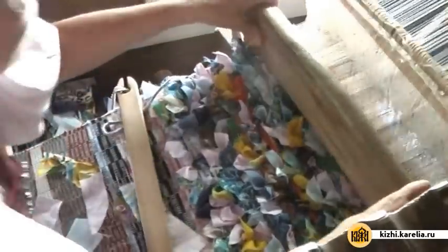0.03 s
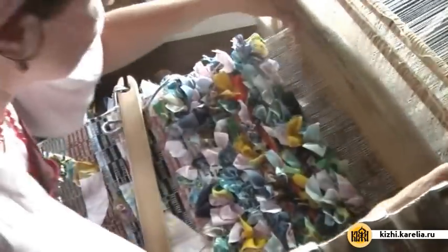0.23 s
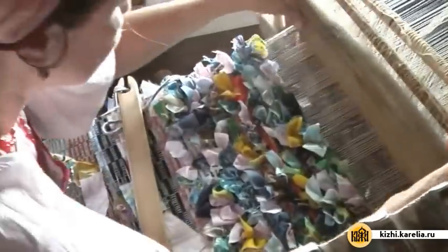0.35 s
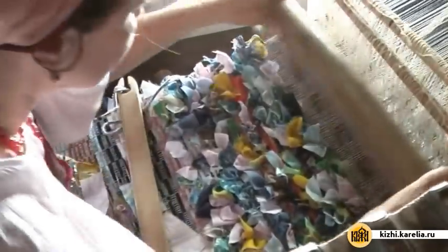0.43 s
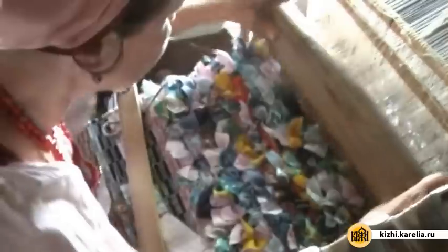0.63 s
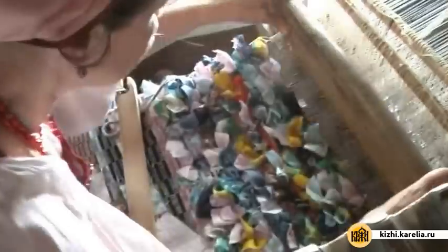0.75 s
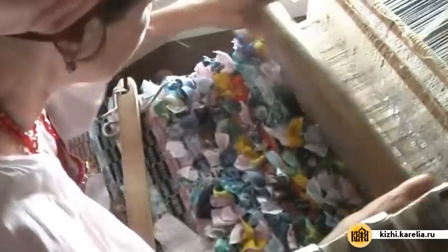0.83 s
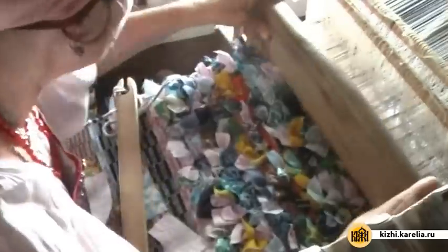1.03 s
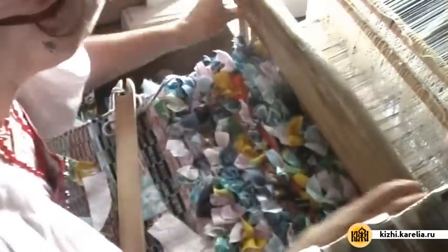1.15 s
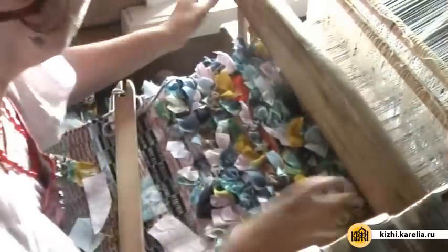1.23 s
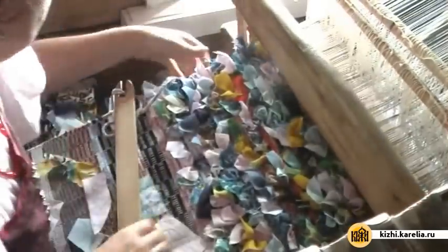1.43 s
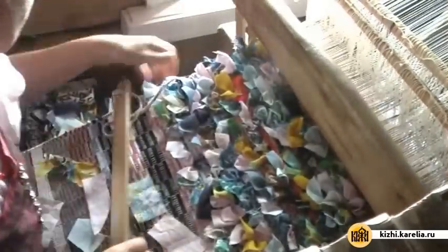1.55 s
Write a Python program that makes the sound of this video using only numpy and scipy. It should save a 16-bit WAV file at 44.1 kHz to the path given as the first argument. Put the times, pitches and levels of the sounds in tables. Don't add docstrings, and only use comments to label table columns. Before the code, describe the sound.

A wooden loom beater knocks lightly, then lands two heavy, clattering blows on rag weave; loose slats rattle and small parts tick, fading into quiet room air. Close microphone in a small room, slightly thin sound.

```python
import sys
import numpy as np
from scipy import signal
from scipy.fft import rfft, irfft
from scipy.io import wavfile
from scipy.ndimage import uniform_filter1d

SR = 44100
rng = np.random.default_rng(int(sys.argv[2]) if len(sys.argv) > 2 else 0)


def to_linear_factor(level_db):
    exponent = np.asarray(level_db, float) / 20
    return 10 ** exponent


def dump_mix(stems):
    frames = np.atleast_2d(stems).T
    limited = np.clip(frames, -1, 1)
    pcm = np.round(limited * 32767).astype(np.int16)
    wavfile.write(sys.argv[1], SR, pcm)


N = 70560

# (time [s], peak [dB], knock pitch [Hz])
BLOWS = [(.118, -30.5, 249), (.168, -23.5, 570), (.2115, -15.5, 385), (.2245, -15, 365), (.231, -17, 412),
         (.25, -19, 234), (.2615, -26.5, 336), (.487, -60, 196), (.556, -15, 870), (.572, -17.5, 196),
         (.596, -8, 660), (.606, -14.5, 550), (.615, -8.5, 287), (.6255, -18, 275), (0.658, -13, 111),
         (.669, -24, 197), (.687, -12, 215), (.745, -19, 186), (0.777, -23, 185), (.920, -18.5, 550),
         (.943, -12.5, 224), (.956, -26, 297), (.969, -6, 255), (.978, -7.5, 251), (.988, -12, 250),
         (1.008, -12, 183), (1.031, -12.5, 114), (1.056, -16.5, 190), (1.15, -23, 360)]
# (frequency [Hz], level [dB], t60 [s])
FRAME_MODES = [(88, -8, .2), (116, -1, .4), (160, -13, .15), (191, 1, .55), (252, -3, .22), (335, -2, .45),
               (382, -5, .15), (480, -10, .1), (540, -9, .1), (655, -8, .1), (765, -11, .08),
               (972, -11, .08)]
# (time [s], peak [dB], brightness [octaves above 1 kHz], t60 [s])
CLACKS = [(0.0476, -27.5, 1.15, 0.24), (0.1456, -26.5, 0.79, 0.13), (0.16, -22.5, 2, 0.13),
          (0.181, -24, 1.46, 0.12), (0.2121, -20.5, 0.13, 0.4), (0.2981, -11, 1.28, 0.25),
          (0.3788, -18, 1.12, 0.14), (0.4732, -29, 1.67, 0.42), (0.512, -28, 2.16, 0.21),
          (0.5601, -9, 1.8, 0.16), (0.5937, -18.5, 0.68, 0.39), (0.6231, -16.5, 2, 0.14),
          (0.6432, -26, 0.87, 0.16), (0.6702, -12, 0.18, 0.13), (0.6785, -8.5, 0.96, 0.12),
          (0.6935, -17.5, 2, 0.12), (0.7908, -20.5, 0.77, 0.18), (0.9197, -7, 1.8, 0.15),
          (0.9461, -9.5, 0.62, 0.14), (1.0086, -14, 1.7, 0.061), (1.0317, -14.5, 1.9, 0.047),
          (1.0645, -15, 1.2, 0.1), (1.0686, -15.5, 1.27, 0.12), (1.096, -19.5, 1.77, 0.26),
          (1.1474, -19, 1.55, 0.046), (1.2012, -28.5, 2.3, 0.11), (1.2091, -22, 1.24, 0.09),
          (1.2281, -33, 0.6, 0.12), (1.3005, -36, 0.78, 0.12), (1.3381, -25, 1.5, 0.074),
          (1.5163, -37.5, 1.68, 0.54)]
# (frequency [Hz], width [Hz], level [dB])
SLAT_MODES = [(1072, 130, 3.5), (1270, 410, 1.5), (1540, 110, -13), (2360, 510, -5.5), (3080, 120, -19.5),
              (5260, 550, -22)]
# (frequency [Hz], level [dB], t60 [s])
BAR_MODES = [(1170, -4, .06), (1340, 0, .07), (1675, -5, .1), (2148, -7, .08), (2530, -2, .1),
             (2896, -3, .1), (3359, -2, .13), (3450, -7, .1), (3850, -5, .05), (4200, -3, .08),
             (4689, -4, .06), (5163, -3, .06), (5572, -4, .06), (5820, -4, .06)]
# (time [s], peak [dB], pitch [Hz], t60 [s])
TAPS = [(.197, -29, 1346, 0.05), (.215, -25, 1680, 0.032), (.2185, -13.5, 382, 0.039),
        (.2325, -12, 383, 0.024), (.2625, -23, 405, .03), (.4755, -32, 1433, .1), (.479, -34, 2850, .04),
        (.487, -34, 1430, 0.082), (.499, -34, 1496, 0.063), (.52, -38, 1460, .06),
        (.5615, -18, 2450, 0.021), (.573, -19, 1438, 0.074), (.582, -17, 1020, 0.031),
        (.625, -24, 1406, 0.043), (.627, -14.5, 705, .04), (.65, -23, 630, 0.021), (.671, -15, 1890, 0.016),
        (.679, -15, 1060, 0.027), (.683, -20.5, 1438, 0.056), (.694, -23, 2256, 0.025),
        (.703, -24.5, 2686, 0.048), (.922, -28, 1614, 0.062), (.926, -16.5, 630, 0.03),
        (.930, -21.5, 955, .04), (.942, -19, 1430, 0.023), (.948, -21, 1052, 0.046),
        (.976, -8.5, 592, 0.025), (.980, -21.5, 1580, 0.038), (.988, -21.5, 895, 0.038),
        (.998, -19.5, 808, 0.08), (1.010, -21, 622, 0.04), (1.035, -26.5, 1312, 0.045),
        (1.072, -19, 1114, 0.035), (1.114, -23, 1317, 0.031), (1.122, -25, 1400, 0.043),
        (1.133, -28.5, 737, 0.03), (1.149, -28, 917, 0.026), (1.151, -28, 2270, 0.02),
        (1.209, -32, 1094, 0.036), (1.231, -28, 1760, 0.012)]
# (time [s], peak [dB], pitch [Hz])
TICKS = [(0.0478, -33.5, 4770), (0.376, -29, 6040), (0.423, -34, 8300), (0.5134, -28, 5210),
         (.5305, -35, 5570), (1.301, -40, 2200), (0.3603, -11, 10650), (0.68, -11.5, 10370),
         (0.6918, -5.5, 10750), (1.069, -44, 5400), (1.071, -18.5, 9740), (1.105, -16, 10400),
         (1.1282, -14.5, 10300), (1.2072, -37, 10560), (1.3385, -27, 5250), (.5625, -18, 4920),
         (.922, -17, 3180), (.947, -15, 5100), (.607, -26, 4000)]
# (frequency ratio [1], level [dB])
TICK_MODES = [(0.986, 1), (2.5, -4), (0.512, -6.5)]
# (time [s], level [dB])
DRAG = [(0, -49.5), (.1, -51.5), (.16, -48), (.3, -48.5), (.45, -53.5), (0.477, -45.5), (.6, -40),
        (.74, -47), (0.798, -41.5), (.84, -54), (0.901, -46.5), (0.949, -35), (1.16, -53.5), (1.19, -56.5),
        (1.299, -71), (1.5, -89), (1.53, -58), (1.6, -56.5)]
# (frequency [Hz], level [dB])
REED_SPECTRUM = [(35, -57), (60, -10), (184, 1), (607, -7.5), (651, -5.5), (1510, -15), (1740, -15.5),
                 (9130, -14.5), (16000, -25.5)]
# (frequency [Hz], t60 [s])
ROOM_T60 = [(100, 0.66), (400, 0.63), (1500, 0.57), (5000, 0.15), (12000, 0.043)]
# (frequency [Hz], level [dB])
FLOOR_SPECTRUM = [(15, -18), (25, 5), (131, -13), (1180, -24.5), (4990, -32.5), (9080, -28.5), (13300, -39),
                  (15200, -37), (16500, -23)]
# (frequency [Hz], left-right correlation [1])
LIKENESS = [(60, 1), (180, 0.82), (550, 0.72), (1650, 0.71), (4970, 0.85), (15000, 0.71)]


def evened(x):
    return x / np.sqrt(np.mean(x ** 2) + 1e-20)


def read(points, hz):
    f, value = np.transpose(points)
    return np.interp(np.log(hz + 1), np.log(f + 1), value)


def add(mix, s, sound):
    part = mix[:, round(s * SR):][:, :sound.shape[1]]
    part += sound[:, :part.shape[1]]


def colour(x, db_at):
    gain = to_linear_factor(db_at(np.fft.rfftfreq(x.shape[-1], 1 / SR)))
    return irfft(rfft(x) * gain, x.shape[-1])


def pair(x, other):
    n = len(x)
    same = np.clip(read(LIKENESS, np.fft.rfftfreq(n, 1 / SR)), 0, 1)
    right = same * rfft(x) + np.sqrt(1 - same ** 2) * rfft(other)
    return np.array([x, irfft(right, n)])


def drag_db():
    s, db = np.transpose(DRAG)
    return np.interp(np.arange(N) / SR, s, db)


def thumps():
    push_db, frame_db, shudder_db, shudder_t60_s = -5, -18.5, -12, 0.19
    knock_cycles, soft_hz = 0.6, 218
    spread_db, near_db_per_octave2 = 3, -7
    out, t = np.zeros((2, N)), np.arange(16384) / SR
    f = np.fft.rfftfreq(len(t), 1 / SR)
    mode_hz, mode_db, t60_s = np.transpose(FRAME_MODES)[:, :, None]
    luck = rng.standard_normal((len(BLOWS), len(FRAME_MODES), 3))
    noise = rng.standard_normal((len(BLOWS), 2, len(t)))
    for (s, db, hz), r, n in zip(BLOWS, luck, noise):
        near_db = near_db_per_octave2 * np.log2(mode_hz / hz) ** 2
        reach = to_linear_factor(mode_db + spread_db * r[:, :1] + near_db)
        swing = reach * to_linear_factor(-60 * t / t60_s) * np.minimum(t / 0.0043, 1)
        phase = 2 * np.pi * mode_hz * t + r[:, 1:2] * 2
        lag = 0.58 * r[:, 2:]
        ring = np.array([(swing * np.sin(phase + side * lag)).sum(0) for side in (-1, 1)])

        body = abs((reach / (1 + 2j * (f - mode_hz) * t60_s / 6)).sum(0))
        shudder = evened(pair(*irfft(rfft(n) * body)))
        shudder = shudder * to_linear_factor(shudder_db - 60 * t / shudder_t60_s) * np.minimum(t / 0.005, 1)

        soft = min(hz / soft_hz, 1)
        u = t * hz / knock_cycles
        knock = np.sin(2 * np.pi * hz * t) * u * np.exp(1 - u)
        add(out, s, to_linear_factor(db) * (to_linear_factor(push_db) * soft * knock + to_linear_factor(frame_db) / soft * ring + shudder))
    return out


def clacks():
    clack_db, ring_db, octave_db = -6.5, -5.5, -4
    crack_db, crack_t60_s, crack_follow = 1, .009, 0.17
    rattle_db, rattle_samples = 2.5, 60
    out, t = np.zeros((2, N)), np.arange(16384) / SR
    f = np.fft.rfftfreq(len(t), 1 / SR)
    slat = sum(to_linear_factor(d) / (1 + 2j * (f - hz) / width_hz) for hz, width_hz, d in SLAT_MODES)
    noise = rng.standard_normal((len(CLACKS), 3, len(t)))
    for (s, db, bright, t60_s), n in zip(CLACKS, noise):
        def tilt(hz):
            return octave_db * (np.log2((hz + 50) / 1000) - bright) ** 2

        ring = irfft(rfft(n[:2]) * (0.76 + abs(slat)))
        ring = evened(pair(*colour(ring, tilt))) * to_linear_factor(ring_db - 60 * t / t60_s)
        grains = uniform_filter1d(n[2, ::-1], rattle_samples)
        grains = evened(uniform_filter1d(grains, rattle_samples))
        ring = ring * to_linear_factor(rattle_db * (grains - .5)) * np.minimum(t / .003, 1)

        crack = evened(colour(n[2], lambda hz: 0.94 * tilt(hz)))
        crack = crack * to_linear_factor(crack_db + crack_follow * (db + 6.5) - 60 * t / crack_t60_s)
        add(out, s, to_linear_factor(db + clack_db) * (ring + crack * np.minimum(t / .0006, 1)))
    return out


def slap():
    slap_s, slap_db = .2983, -23.5
    out, t = np.zeros((2, N)), np.arange(SR // 4) / SR
    for after_s, db in ((0, 2.5), (.0028, -9.5), (.0095, -21.5)):
        phases = rng.uniform(0, 2.5, (len(BAR_MODES), 1, 1)) + rng.uniform(0, .8, (len(BAR_MODES), 2, 1))
        ring = sum(to_linear_factor(d - 60 * t / t60_s) * np.sin(2 * np.pi * hz * t + phase)
                   for (hz, d, t60_s), phase in zip(BAR_MODES, phases))
        add(out, slap_s + after_s, to_linear_factor(slap_db + db) * ring)
    return out


def taps():
    rise_s, partner_db, detune = 0.0013, -2.5, 0.0803
    out, t = np.zeros((2, N)), np.arange(4096) / SR
    luck = rng.uniform(-1.02, 1, (len(TAPS), 3))
    for (s, db, hz, t60_s), (off, turn, side) in zip(TAPS, luck):
        lag = np.array([[-1], [1]]) * side * 0.45
        partner_hz = hz * (1 + detune * (off + np.sign(off)))
        partner = np.sin(2 * np.pi * partner_hz * t + 3 * turn - lag)
        tone = np.sin(2 * np.pi * hz * t + lag) + to_linear_factor(partner_db) * partner
        add(out, s, to_linear_factor(db - 60 * t / t60_s) * (1 - np.exp(-t / rise_s)) * tone)
    return out


def ticks():
    width_ms, centre_s, fizz_db, fizz_t60_s = 0.14, .001, -11, 0.026
    out, t = np.zeros((2, N)), np.arange(4096) / SR
    side_db = np.array([[1.5], [-1.5]])
    noise = rng.standard_normal((len(TICKS), 2, len(t)))
    for (s, db, hz), n in zip(TICKS, noise):
        ring = sum(to_linear_factor(d) * np.sin(2 * np.pi * hz * ratio * t) for ratio, d in TICK_MODES)
        ring = ring * np.exp(-.5 * ((t - centre_s) * 1000 / width_ms) ** 2)
        fizz = evened(pair(*colour(n, lambda f: -60 * np.log2((f + 50) / hz) ** 2)))
        fizz = fizz * to_linear_factor(fizz_db - 60 * t / fizz_t60_s) * (t > centre_s)
        add(out, s - centre_s, to_linear_factor(db + side_db) * (ring + fizz))
    return out


def reed():
    snaps_per_s, snap_db, snap_share = 2000, 3.3, .45
    squeak_hz, squeak_width_hz, squeak_db = 1540, 460, 7.5
    size = to_linear_factor(snap_db * np.minimum(rng.exponential(1, (2, N)), 4))
    struck = rng.random((2, N)) < snaps_per_s / SR
    snaps = size * struck * rng.choice([-1., 1.], (2, N))
    rub = snap_share * evened(snaps) + (1 - snap_share) * rng.standard_normal((2, N))

    def reed_db(f):
        return read(REED_SPECTRUM, f) + squeak_db / (1 + ((f - squeak_hz) / squeak_width_hz) ** 2)

    rub = colour(rub, reed_db)
    band = colour(rub[0], lambda f: np.where((f > 2000) & (f < 8000), 0, -90))
    return pair(*rub) / band.std() * to_linear_factor(drag_db() - 1.0)


def rumble():
    rumble_db, follow = -54, 0.27
    f = np.fft.rfftfreq(N, 1 / SR)
    body = sum(to_linear_factor(d) / np.sqrt(1 + (2 * (f - hz) * t60_s) ** 2) for hz, d, t60_s in FRAME_MODES[:6])
    hum = irfft(rfft(rng.standard_normal((2, N))) * body, N)
    return evened(pair(*hum)) * to_linear_factor(rumble_db + follow * (drag_db() + 37.0))


def room(x):
    length, spacing = SR // 2, 20
    echoes = np.zeros((2, length))
    at = np.arange(120, length - 20, spacing)
    at = at + rng.integers(0, spacing, (2, len(at)))
    np.put_along_axis(echoes, at, rng.choice([-1., 1.], at.shape), 1)
    hz, t, z = signal.stft(echoes, SR, nperseg=256)
    decay = to_linear_factor(-60 * t / read(ROOM_T60, hz)[:, None])
    tail = signal.istft(z * decay, SR, nperseg=256)[1]
    wet = signal.fftconvolve(x[None], tail / np.linalg.norm(tail[0]), axes=1)[:, :N]
    return pair(*wet)


def floor():
    hiss = colour(rng.standard_normal((2, N)), lambda f: read(FLOOR_SPECTRUM, f))
    return to_linear_factor(-53) * evened(pair(*hiss))


def scene():
    room_db = -12
    wood = thumps() + clacks() + slap() + taps()
    return wood + ticks() + reed() + rumble() + to_linear_factor(room_db) * room(wood.mean(0)) + floor()


def roll_off(x):
    return signal.sosfilt(signal.butter(12, 16840, fs=SR, output="sos"), x)


def record(dry):
    low_cut_hz, high_cut_hz = 77.4, 14700
    hum_delay_samples, hum_narrow, hum_top_hz = 147, .91, 5500
    dry = signal.sosfilt(signal.butter(3, low_cut_hz, 'high', fs=SR, output='sos'), dry)
    dry = signal.sosfilt(signal.butter(8, high_cut_hz, fs=SR, output='sos'), dry)
    delayed = np.zeros(hum_delay_samples + 1)
    delayed[-1] = 1
    direct = delayed[::-1]
    notched = signal.lfilter(direct - delayed, direct - hum_narrow * delayed, dry)
    notched = notched * (1 + hum_narrow) / 2
    mix = dry + colour(notched - dry, lambda f: -6 * (f / hum_top_hz) ** 4)
    return roll_off(mix)


dry = scene()
out = record(dry)
dump_mix(out)
```